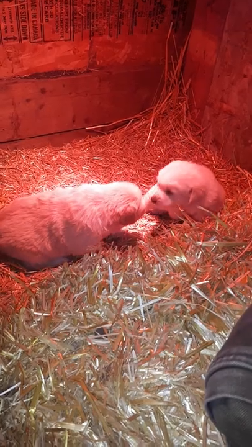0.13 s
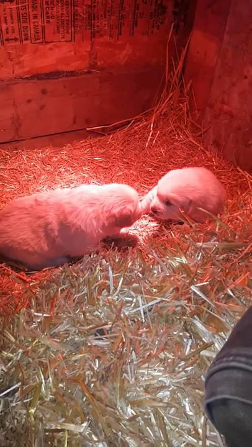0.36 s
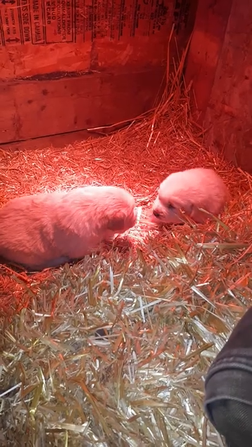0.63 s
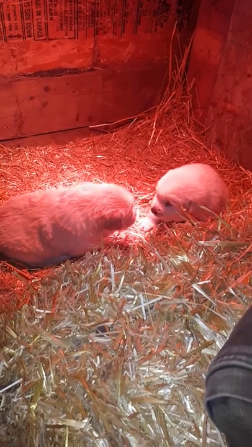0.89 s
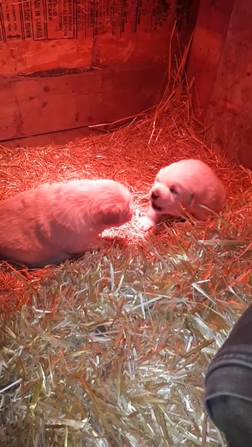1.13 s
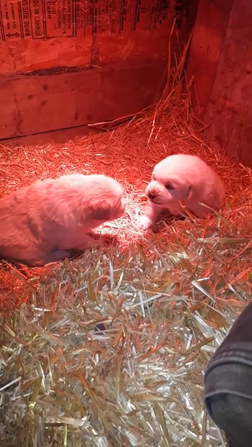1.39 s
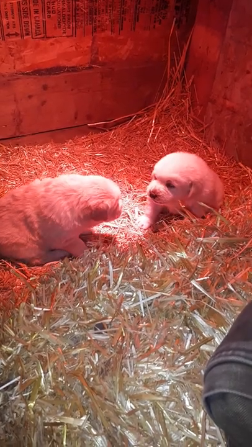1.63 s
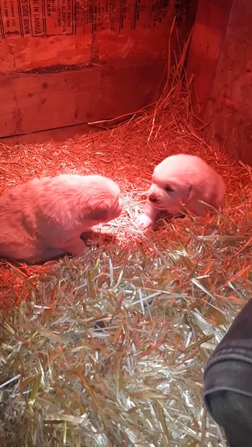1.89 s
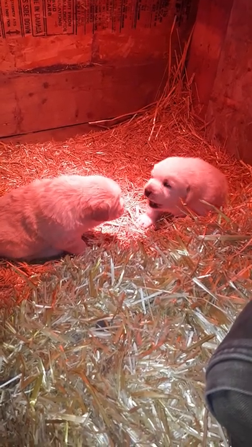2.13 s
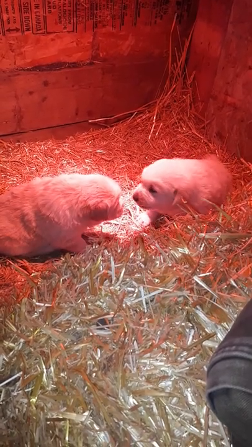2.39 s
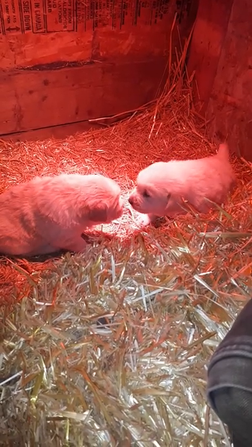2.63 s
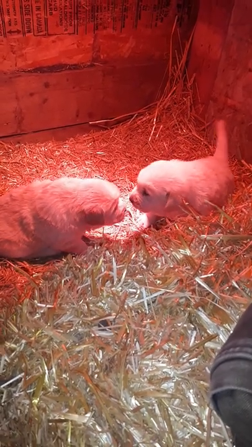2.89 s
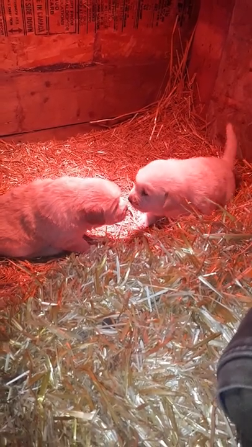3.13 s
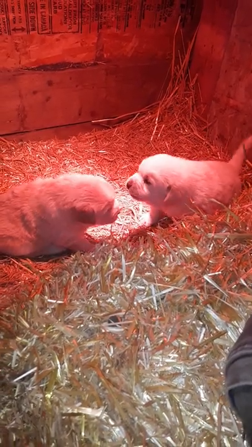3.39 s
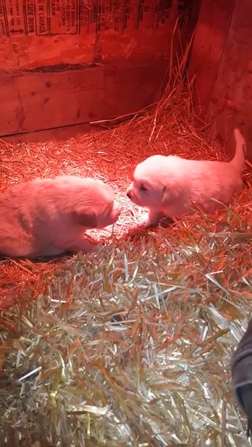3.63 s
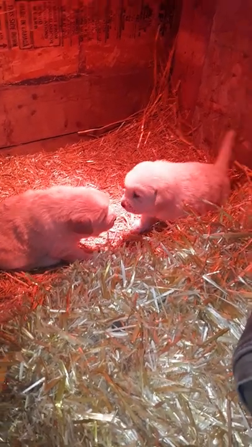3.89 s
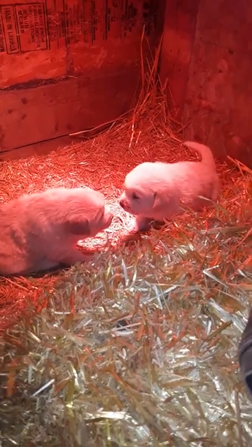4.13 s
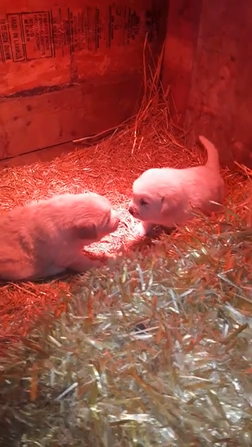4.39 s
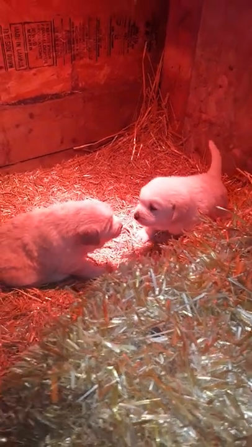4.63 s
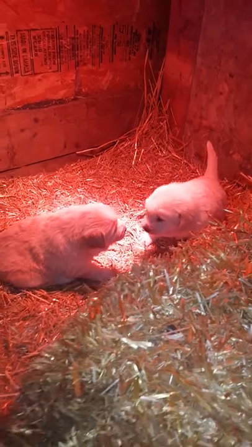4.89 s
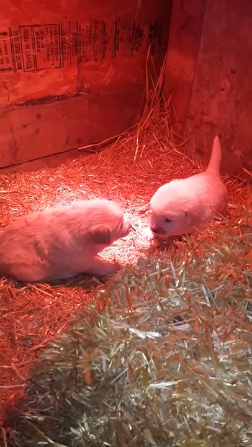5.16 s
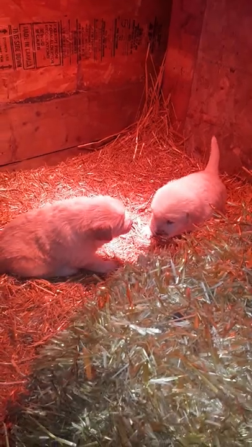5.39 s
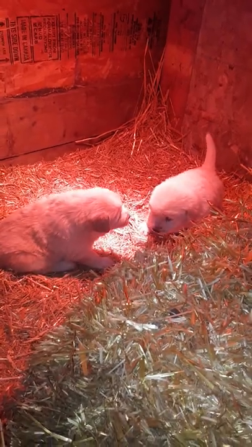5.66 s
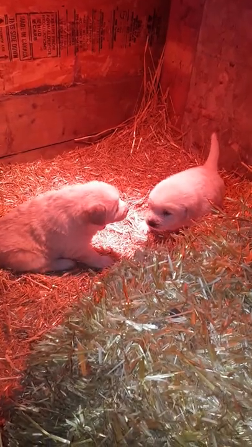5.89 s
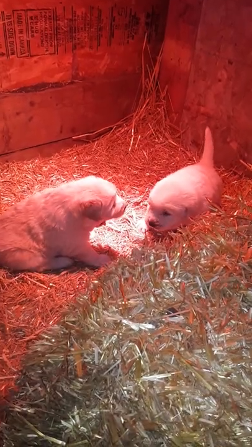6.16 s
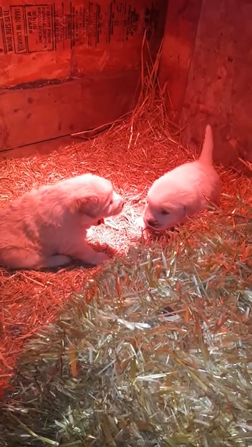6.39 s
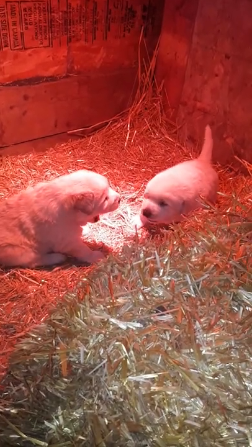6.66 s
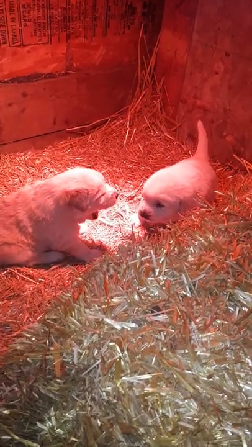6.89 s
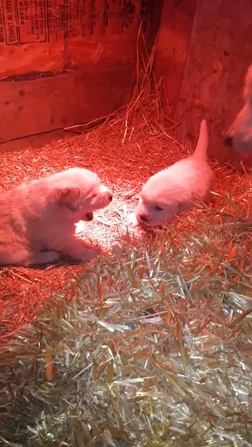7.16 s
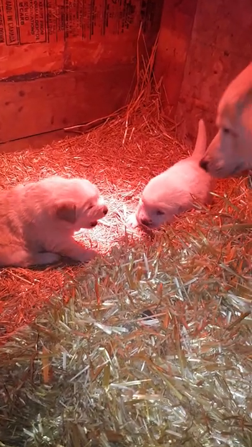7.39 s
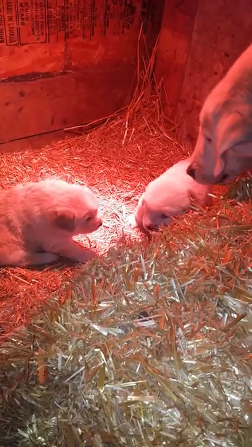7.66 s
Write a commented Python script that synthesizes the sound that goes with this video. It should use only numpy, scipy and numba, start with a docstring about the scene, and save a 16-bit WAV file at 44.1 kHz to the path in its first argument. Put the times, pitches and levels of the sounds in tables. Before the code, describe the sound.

Small puppy's rough fluttering growls rise into six short high yaps about a second apart, with dry straw crackle and a faint adult dog grunt.

```python
"""In a straw-filled wooden pen, a puppy growls in throbs and breaks into six sharp barks, left of a hand-held phone.
Vocal-fold pulses glide up and down through the throat; around the top of a bark a squeal near the mouth resonance joins.
Shaped noise makes the gasps, the straw rustle and the low barn rumble; short decaying tones make smacks and stalk snaps.
The mother's grunt is slow fold pulses with breath, and a noise tail gives the pup the short ring of the boards."""
import sys
import numpy as np
from scipy import signal
from scipy.fft import rfft, irfft
from scipy.io import wavfile
from scipy.ndimage import uniform_filter1d, minimum_filter1d
from numba import njit

SR = 44100
rng = np.random.default_rng(int(sys.argv[2]) if len(sys.argv) > 2 else 0)


def boost_factor(decibels):
    """Convert a level in decibels to a linear amplitude factor."""
    exponent = np.asarray(decibels, float) / 20
    return 10 ** exponent


def store_wav(level_fs):
    """Save 16-bit WAV to argv[1]."""
    pcm = np.round(np.clip(np.atleast_2d(level_fs), -1, 1) * 32767)
    wavfile.write(sys.argv[1], SR, pcm.T.astype(np.int16))


N = 343091
T = np.arange(N) / SR


def unit(x):
    """Scale to rms 1."""
    return x / np.sqrt(np.mean(x ** 2))


def even(x, span_s=0.038):
    """Hold the short-time rms near 1."""
    return x / np.sqrt(uniform_filter1d(x ** 2, int(span_s * SR)) + 1e-12)


def walk(rate):
    """Random levels held 1 / rate s and smoothed twice; spread near 1."""
    held = int(SR / rate)
    levels = np.repeat(rng.standard_normal(N // held + 1), held)
    return 1.4 * uniform_filter1d(uniform_filter1d(levels, held), held)[:N]


def track(tables, edge_s=0.0086):
    """Columns over time, and a soft-edged gate that is open inside the tables."""
    s, *columns = np.concatenate(tables).T
    gate = sum((T >= rows[0][0]) & (T < rows[-1][0]) for rows in tables)
    gate = uniform_filter1d(np.minimum(gate, 1.), int(edge_s * SR))
    return [np.interp(T, s, column) for column in columns] + [gate]


def swells(s, hold_s, db, rise_db_s, fall_db_s):
    """Level in dB of the loudest of several swells, each a straight rise, a hold and a straight fall."""
    rows = np.broadcast(s, hold_s, db, rise_db_s, fall_db_s)
    return np.max([peak - rise * np.maximum(start - T, 0) - fall * np.maximum(T - start - hold, 0)
                   for start, hold, peak, rise, fall in rows], axis=0)


def shape(x, table):
    """Colour by points of (frequency [Hz], gain [dB])."""
    hz, db = np.transpose(table)
    f = np.fft.rfftfreq(N, 1 / SR) + 1
    return irfft(rfft(x) * boost_factor(np.interp(np.log(f), np.log(hz), db)), N)


def cut(x, order, hz, kind):
    """Butterworth filter: keep or remove the part of the sound beside or between the edges."""
    return signal.sosfilt(signal.butter(order, hz, kind, fs=SR, output="sos"), x)


@njit
def svf(x, hz, width):
    """Band-pass with a moving centre, gain 1 there."""
    y, band, low = np.empty(len(x)), 0., 0.
    for i in range(len(x)):
        g, k = np.tan(np.pi * hz[i] / SR), width / hz[i]
        v = (band + g * (x[i] - low)) / (1 + g * (g + k))
        band, low, y[i] = 2 * v - band, low + 2 * g * v, k * v
    return y


@njit
def folds(hz, rough, chance, jitter, shimmer):
    """Vocal folds: one pulse a cycle; roughness scatters the length and size of each."""
    pulses, phase, p, k = np.zeros(len(hz) + 1), np.empty(len(hz)), 0., 0
    for i in range(len(hz)):
        step = hz[i] * (1 + jitter * rough[i] * chance[k, 0]) / SR
        p += step
        if p >= 1:
            p, k = p - 1, k + 1
            size = np.exp(shimmer * rough[i] * chance[k, 1])
            # share the pulse between two samples, so it can fall between them
            pulses[i] += size * p / step
            pulses[i + 1] += size * (1 - p / step)
        phase[i] = p
    return pulses[:-1], phase


def tract(x, modes, stretch=0.96):
    """Throat resonances side by side, with alternating sign; stretch moves every centre."""
    return sum((-1) ** k * boost_factor(db) * svf(x, np.full(N, 1. * hz) * stretch, 1. * width)
               for k, (hz, width, db) in enumerate(modes))


# colour of the barn's air: (frequency [Hz], relative level [dB per Hz])
BARN_TONE = [(15, -43), (25, -16.5), (102, -9), (157, -5.5), (229, -3.5), (439, -24.5), (695, -23.5),
             (1020, -29), (2110, -34), (3340, -48.5), (6380, -46), (9070, -60.5), (16000, -45)]
# slow rise and fall of the rumble: (time [s], level before a 3.5 dB cut [dB])
RUMBLE_LEVEL = [(0.0, -63.5), (0.71, -60), (0.84, -40), (1.13, -82.5), (1.23, -64.5), (1.78, -97),
                (2.86, -63.5), (2.99, -65.5), (5.33, -48), (7.09, -61), (7.71, -56), (7.78, -56)]


def barn():
    """Quiet air of the barn as noise, alike at both ports in the bass, and a low rumble that swells."""
    mid, side, low = rng.standard_normal((3, N))
    side = shape(side, [(60, -15), (300, -12.0), (700, 1.5), (1400, 6.5)])
    air = unit(shape(mid + side * np.array([[1], [-1]]), BARN_TONE)) * boost_factor(-53.5 + walk(3.1))
    rumble = unit(shape(low, [(25, -40.5), (50, 3.5), (100, -2.0), (150, 13), (220, -40.5)]))
    return air + rumble * boost_factor(track([RUMBLE_LEVEL])[0] - 3.5 + 2 * walk(13))


# steady bed of straw: (time [s], level before a 1 dB cut [dB], boost of the coarse stalks [dB])
STRAW_BED = [(0.0, -76.5, 14.5), (.45, -79, 20.5), (.55, -67.5, 19.5), (1.04, -66, 8), (1.32, -62.5, 15),
             (1.56, -49.5, 1), (1.73, -52.5, 12.5), (1.78, -76, 19), (2.0, -77.5, 8), (2.27, -67.5, 19.5),
             (2.71, -58, 8.5), (2.86, -58.5, 22.5), (3.68, -44, 13.5), (3.83, -52, 16.5), (4.81, -56, 18.5),
             (5.31, -72.5, 21.5), (5.5, -55, 20.5), (6.41, -58.5, 14.5), (6.76, -53.5, 17),
             (7.78, -55.5, 6.5)]
# rustles when a paw or body shifts:
# (peak time [s], level before a 1 dB cut [dB], rise [dB per s], fall [dB per s])
STRAW_RUSTLES = [(.54, -55.5, 330, 57), (.65, -68, 39.5, 357), (1.19, -36.5, 155.5, 201),
                 (1.86, -60, 241, 152), (2.12, -56, 209, 29), (2.21, -52, 52, 351.5), (2.73, -46, 703, 22),
                 (2.82, -41.5, 70.5, 220), (3.03, -49, 17.5, 62), (3.44, -32, 96.5, 220),
                 (3.75, -38.5, 96, 138), (4.29, -44, 73.5, 11.5), (4.55, -42, 243.5, 180),
                 (5.79, -45.5, 88, 199), (6.69, -47, 62, 98), (7.04, -49, 20, 81),
                 (7.17, -33.5, 603.5, 170), (7.47, -50, 17.5, 32)]
# balance of the straw: (time [s], left minus right [dB])
STRAW_BALANCE = [(0.0, 25), (0.3, -3), (0.41, 21), (2.36, 11), (2.45, 1.5), (3.72, 4.5), (4.12, 6),
                 (7.78, 17)]
# colour of rubbing stalks: (frequency [Hz], relative level [dB per Hz])
STALK_TONE = [(710, -21.5), (1200, -20.5), (2100, -12.5), (3120, -17), (3970, -11), (5570, -11.5),
              (6500, -9), (7570, -14.5), (9030, -19.5), (11400, 1), (14600, 12), (16000, 3.5), (16500, -37)]


def straw():
    """Stalks rub in a hiss of tiny clicks, unrelated at the two ports."""
    bed_db, coarse_db, _ = track([STRAW_BED])
    s, peak_db, rise, fall = np.transpose(STRAW_RUSTLES)
    db = np.maximum(bed_db, swells(s, 0, peak_db, rise, fall))
    coarse_db = coarse_db - 0.35 * (db - bed_db)  # a louder rustle has a smaller share of coarse stalks
    balance_db, _ = track([STRAW_BALANCE])
    # about 2500 clicks a second at each port
    ticks = (rng.random((2, N)) < 2500 / SR) * boost_factor(2.5 * rng.exponential(size=(2, N)))
    rub = shape(rng.standard_normal((2, N)) * (1 + .5 * ticks), STALK_TONE)
    fine = cut(rub, 4, 8500, "high")
    coarse = cut(rub, 4, 8500, "low")
    hiss = (fine + coarse * boost_factor(coarse_db)) / np.std(fine)
    return hiss * boost_factor(db - 1 + 2 * walk(45) + np.array([balance_db, -balance_db]) / 2)


# single stalks: (time [s], level of the tone at its start [dB], frequency [Hz], left minus right [dB])
STALK_SNAPS = [(0.6514, -39.5, 15200, 15), (0.8257, -39.5, 7140, 23), (0.9882, -47.5, 12300, 20.5),
               (1.173, -21.5, 13800, 9.5), (1.8097, -38, 15380, 13.5), (2.682, -50, 12060, -6.5),
               (2.7192, -44.5, 12200, 7), (4.191, -45, 14400, 21.5), (4.5491, -30.5, 15300, 20),
               (4.7202, -36, 12610, 6.5), (5.0998, -47, 13900, 20), (5.2582, -41.5, 13300, 19),
               (5.7641, -33, 15400, 19), (6.3856, -37, 15600, 4.5), (7.1413, -48.5, 13000, 16),
               (7.1637, -32.5, 13500, 21), (7.2817, -36, 14950, 22.5)]


def snaps():
    """Single stalks snap: a high tone and a crackle of noise that die away in milliseconds."""
    out = np.zeros((2, N))
    t = np.arange(SR // 100) / SR
    for s, peak_db, hz, side_db in STALK_SNAPS:
        i = int(s * SR)
        crack = np.gradient(rng.standard_normal(len(t))) * 0.34 + np.sin(2 * np.pi * hz * t)
        snap = boost_factor(peak_db + np.array([[side_db], [-side_db]]) / 2) * crack * np.exp(-t / 0.002)
        out[:, i:i + len(t)] += snap[:, :N - i]
    return out


# growl, one list a breath:
# (time [s], basic pitch [Hz], chest level [dB], mouth level [dB], rasp level [dB])
GROWL_BREATHS = [
    [(.3, 200, -58, -80, -85), (.36, 204.9, -49, -69, -86), (.45, 209.1, -43, -59.5, -82),
     (.71, 200.3, -45.5, -59, -70)],
    [(1.03, 270, -55, -67.5, -67), (1.26, 280, -33.5, -39.5, -46), (1.6, 297.7, -33.5, -41, -39.5),
     (1.7, 300, -35.5, -43, -42), (1.77, 264.8, -47, -56.5, -58)],
    [(2.03, 250, -48.5, -60, -77), (2.26, 244.5, -44, -40.5, -52), (2.4, 227.5, -43.5, -58.5, -73),
     (2.61, 209.7, -46, -61, -73)],
    [(3.16, 224.8, -56, -49, -62), (3.4, 250, -35.5, -35, -45), (3.64, 233.3, -39.5, -52.5, -64)],
    [(3.74, 204.3, -45.5, -70, -59), (4.05, 203.7, -46.5, -65, -88), (4.39, 214.8, -43, -54.5, -49),
     (4.68, 257.9, -33, -40, -47), (4.79, 224.3, -33.5, -47, -54), (5.17, 228.8, -33, -45.5, -67),
     (5.21, 206.7, -38.5, -54.5, -98), (5.43, 198.9, -41.5, -55, -57), (5.6, 220.3, -36, -62, -68),
     (5.86, 264.1, -30.5, -38.5, -45), (6.12, 222, -35.5, -51.5, -68), (6.19, 235.5, -45.5, -67.5, -75)],
    [(6.45, 214.8, -48.5, -68.5, -74), (6.6, 225.7, -45, -56, -59.5), (6.72, 228.8, -34.5, -33, -38),
     (6.78, 213.5, -33, -46, -72), (6.95, 203.6, -51, -57.5, -55)],
]


def growl():
    """The pup's growl breath by breath: pitch, the three levels, and a gate that shuts between breaths."""
    hz, *levels_db, gate = track(GROWL_BREATHS, 0.048)
    return hz, levels_db, gate ** 2


# throbs of each growl: (first throb [s], rate [per s], depth with the mouth shut [0-1])
GROWL_THROBS = [(0.381, 25.2, .3), (1.305, 25.4, .4), (2.331, 22, .4), (3.416, 20, .3), (3.761, 24.5, .2),
                (4.665, 23.9, .45), (5.201, 23.3, .2), (5.873, 23.7, .3), (6.712, 19, 0.3)]


def flap(opening):
    """A flap of tissue throbs the growl, less as the mouth opens: its depth and its phase."""
    row = np.maximum(np.searchsorted(np.array(GROWL_THROBS)[:, 0], T + .04) - 1, 0)
    start, rate, depth = np.array(GROWL_THROBS)[row].T
    phase = 2 * np.pi * (rate * (T - start) + .07 * walk(12))
    return np.clip(depth, 0, 1) * (1 - opening), phase


# chest resonances: (centre before a 4 % drop [Hz], width [Hz], gain [dB])
CHEST_MODES = [(270, 130, 7), (732, 81.6, 7.5)]


def chest(pulses, air, rough):
    """Fold pulses and breath ring in the low resonances of the chest."""
    low = tract(unit(pulses) + 0.7 * rough * unit(air), CHEST_MODES)
    return even(cut(low, 4, [150, 830], "band"))


# mouth resonances, shut and open: (centre before stretching [Hz], width [Hz], gain [dB])
MOUTH_SHUT_MODES = [(1174, 1100, -0.5), (1620, 57, 5), (1660, 130, -3), (2152, 43, 3)]
MOUTH_OPEN_MODES = [(1036, 190, 4.5), (1777, 73, 2.5), (2026, 140, 1.5), (2635, 130, -5)]


def mouth(shut_voice, open_voice, opening, stretch):
    """Middle resonances: the sound fades from the shut mouth to the open one as it opens."""
    shut = unit(tract(shut_voice, MOUTH_SHUT_MODES, 1 + 0.038 * walk(5)))
    wide = unit(tract(open_voice, MOUTH_OPEN_MODES, stretch))
    return even(cut((1 - opening) * shut + opening * wide, 6, [980, 2700], "band"))


# rasp resonances with the mouth shut: (centre before a 4 % drop [Hz], width [Hz], gain [dB])
RASP_SHUT_MODES = [(2910, 360, 11), (3350, 170, 10), (5270, 500, -18), (7400, 130, -33.5)]
# and open, passed twice: (centre before stretching [Hz], width [Hz], gain of one pass [dB])
RASP_OPEN_MODES = [(2840, 94, 2), (3460, 494, 1.5), (4530, 840, -2), (5600, 1210, -7.5)]


def rasp(shut_voice, open_voice, opening, stretch):
    """High resonances: a rasp that fades from the shut mouth to the open one."""
    shut = unit(tract(shut_voice, RASP_SHUT_MODES))
    once = tract(open_voice, RASP_OPEN_MODES, stretch)
    wide = unit(tract(once, RASP_OPEN_MODES, stretch))
    return even(cut((1 - opening) * shut + opening * wide, 4, [2600, 7600], "band"))


def voice():
    """Growl and bark: fold pulses ring in chest, mouth and rasp; effort opens the mouth and stills the throb."""
    growl_hz, growl_db, gate = growl()
    hz, levels_db, rough, squeal_hz, effort, squealing = bark(growl_hz, growl_db)
    chest_db, mouth_db, rasp_db = levels_db
    opening = np.clip(np.maximum((mouth_db + 37) / 12, 2.5 * effort - .3), 0, 1)
    depth, flap_phase = flap(opening)
    throb = (1 + depth * np.cos(flap_phase)) * boost_factor(walk(40))
    # the flap also bends the pitch, and rough folds let it waver
    hz = hz * (1 + .2 * depth * np.sin(flap_phase) + .1 * rough * walk(140))
    pulses, fold_phase = folds(hz, np.clip(rough, 0, 1), rng.standard_normal((N // 20, 2)), .12, .5)
    # breath is strongest just after each pulse
    air = rng.standard_normal(N) * np.exp(-fold_phase / 0.36)
    tone, squeal_phase = squeal(fold_phase, squeal_hz, effort, squealing)
    # the squeal chops the fold pulses, so sum and difference lines fill the mouth
    chopped = unit(pulses) * (1 + .9 * squealing * np.cos(squeal_phase))
    breathy = chopped + (1.2 - .9 * opening) * rough * unit(air)
    # with the mouth shut the nose cuts a deep notch near 2.5 kHz
    shut_voice = cut(breathy, 3, [2300, 2700], "bandstop")
    # the larynx rises with the pitch and shortens the throat
    stretch = (hz / 700) ** 0.072
    upper = boost_factor(mouth_db) * mouth(shut_voice, breathy, opening, stretch)
    upper = upper + boost_factor(rasp_db) * rasp(shut_voice, breathy, opening, stretch)
    upper = upper * boost_factor(3 * opening * walk(70))  # the open voice breaks up
    lower = boost_factor(chest_db) * chest(pulses, air, rough)
    return gate * (throb * lower + throb ** 0.53 * upper) + tone + whine()


def pen(x):
    """The boards return a dense short tail whose treble dies first."""
    t60_s, treble_t60_s, level_db = .33, .22, -11
    t = np.arange(int(.6 * SR)) / SR
    noise = rng.standard_normal((2, len(t)))
    dull = cut(noise, 2, 2000, "low")
    tail = dull * boost_factor(-60 * t / t60_s) + (noise - dull) * boost_factor(-60 * t / treble_t60_s)
    tail = tail * (t > .003)
    # so small a pen holds no bass
    tail = cut(tail, 1, 350, "high")
    return boost_factor(level_db) * signal.fftconvolve(x, tail / np.sqrt(np.sum(tail[0] ** 2)), axes=1)[:, :N]


# (peak time [s], rise [s], fall [s], level of the throat noise at the peak [dB], throat resonance [Hz])
PUP_GASPS = [(.82, 0.11, .15, -44.5, 2480), (2.75, 0.026, 0.14, -45, 1620), (3.795, 0.1, 0.25, -47, 1590),
             (6.298, 0.045, 0.024, -50.5, 1228)]


def gasps():
    """Air drawn through the throat: fluttering noise in a resonance, a nose whistle and a low puff."""
    edge_db = -18.5  # start and end of a gasp against its peak
    db, hz, gate = track([[(s - rise, db + edge_db, hz), (s, db, hz), (s + fall, db + edge_db, hz)]
                          for s, rise, fall, db, hz in PUP_GASPS])
    air = rng.standard_normal(N) * boost_factor(3.5 * walk(60))
    throat = unit(svf(air, hz, 280.))
    puff = unit(tract(air, [(300, 490, 0)])) * boost_factor(4.0)
    whistle = unit(tract(air, [(6460, 600, 0)])) * boost_factor(-27.0)
    return gate * boost_factor(db) * (throat + puff + whistle)


# (time [s], level of the tone at its start [dB], frequency [Hz])
LIP_SMACKS = [(0.795, -31, 2480), (0.869, -27, 2520), (0.904, -35.5, 870), (0.931, -36, 2188),
              (4.19, -44.5, 1270), (6.284, -31.5, 872)]


def smacks():
    """Lips smack: each is a tone with a little noise that dies away in milliseconds."""
    out = np.zeros(N)
    t = np.arange(SR // 50) / SR
    for s, peak_db, hz in LIP_SMACKS:
        pop = np.sin(2 * np.pi * hz * t) + 0.16 * rng.standard_normal(len(t))
        out[int(s * SR):int(s * SR) + len(t)] += boost_factor(peak_db) * pop * np.exp(-t / .0015)
    return out


# the six barks: (top time [s], rise [s], pitch at the top [Hz], squeal at full effort [Hz],
# mouth change on the way up [dB], mouth change on the way down [dB], rasp change [dB])
BARK_TOPS = [(1.12, 0.085, 876, 1206, 2, 4, 3.3), (2.14, 0.1, 813.4, 1156, -2, -9, -1.5),
             (3.28, .104, 894.9, 1189, 0.15, 0.37, -1.5), (4.5, 0.093, 862.1, 1106, -1.8, 1.5, -1.5),
             (5.702, .09, 851.8, 1156, -7.5, 5, 1.5), (6.575, .098, 857, 1160, -13, 1, 2.5)]
# course of every bark: (time from the top for a .09 s rise [s], chest level [dB],
# mouth level before its change [dB], rasp level before its change [dB], roughness [0-1])
BARK_COURSE = [(-.1, -75.5, -75, -90, .3), (-.085, -39.5, -48.5, -57, .3), (-.072, -34, -33, -35.5, .15),
               (-.055, -34, -25.5, -26.5, .15), (-.03, -35, -12.5, -20.5, .2), (-.012, -54, -21, -19.5, .4),
               (0.016, -52.5, -18, -18.5, .4), (0.028, -39.5, -12.5, -22.5, .3),
               (0.046, -29.5, -17.5, -31.5, .2), (.065, -34.5, -23.5, -39, .15),
               (0.099, -30.5, -29, -43.5, .15), (.14, -38, -40.5, -52, .25), (0.201, -68, -80.5, -85, .3)]


def bark(growl_hz, growl_db):
    """Each bark is an arch of effort over the growl: it lifts the pitch and plays the same course of levels."""
    sag_s, sag_power = .052, 3.4  # effort halves this long after the top
    tops = np.array(BARK_TOPS)[:, 0]
    nearest = np.searchsorted((tops[1:] + tops[:-1]) / 2, T)
    top, rise, top_hz, squeal_hz, up_db, down_db, bite_db = np.array(BARK_TOPS)[nearest].T
    since = T - top
    climb = np.cos(np.pi / 2 * np.clip(since / rise, -1, 0))
    effort = np.where(since < 0, climb, 1 / (1 + (np.abs(since) / sag_s) ** sag_power))
    hz = growl_hz + (top_hz - growl_hz) * effort
    since = np.where(since < 0, since * .09 / rise, since)
    s, *levels, roughness = np.transpose(BARK_COURSE)
    chest_db, mouth_db, rasp_db = (np.interp(since, s, level, left=-120, right=-120) for level in levels)
    rough = np.interp(since, s, roughness, left=.37, right=.37)  # outside a bark: the growl's roughness
    mouth_db = mouth_db + up_db + (down_db - up_db) * np.clip(.5 + since / .04, 0, 1)
    levels_db = np.maximum(growl_db, [chest_db, mouth_db, rasp_db + bite_db])
    squealing = uniform_filter1d(1. * (since > -0.083) * (since < .075), SR // 100)
    squeal_hz = squeal_hz * (1 - .2 * (1 - effort))  # the squeal sags as effort falls
    return hz, levels_db, rough, squeal_hz, effort, squealing


# the squeal: (start of hold [s], hold [s], basic level [dB])
SQUEAL_SWELLS = [(1.118, 0.026, -7.5), (2.105, 0.067, -7.5), (3.216, .008, -21), (3.294, 0.042, -12.5),
                 (4.487, 0.0061, -10.5), (4.523, 0.019, -16.5), (5.662, .01, -19.5), (5.759, .01, -32.5),
                 (6.543, 0.015, -16.5), (6.619, 0.012, -11)]
# the squeal flips to its octave: (start of hold [s], hold [s], basic level [dB])
OCTAVE_SWELLS = [(1.075, .02, -17.5), (1.113, 0.0085, -17), (2.06, 0.013, -28.5), (3.241, 0.016, -19.5),
                 (3.35, .01, -52), (4.471, .01, -16.5), (4.51, 0.009, -22.5), (5.692, 0.0092, -8.5),
                 (6.533, 0.041, -17.5)]


def squeal(fold_phase, hz, effort, gate):
    """A second, higher oscillation; the folds below beat against it and throw side lines."""
    first_db = swells(*np.transpose(SQUEAL_SWELLS), 599.5, 549.5)
    octave_db = swells(*np.transpose(OCTAVE_SWELLS), 599.5, 599.5)
    third_db = first_db - 9 - 19.5 * (1 - effort)  # fades as effort falls
    fourth_db = octave_db - 11.5
    phase = 2 * np.pi * np.cumsum(hz * (1 + .009 * walk(150))) / SR
    tone = sum(boost_factor(db + 2.5 * walk(90)) * np.sin((k + 1) * phase)
               for k, db in enumerate((first_db, octave_db, third_db, fourth_db)))
    tone = np.sqrt(2) * gate * tone * (1 + 0.3 * np.cos(2 * np.pi * fold_phase))
    return cut(tone, 4, 800, "high"), phase


def whine():
    """A thin wavering tone near 1160 Hz that dies away after the top of the second bark."""
    tone = np.sin(2 * np.pi * np.cumsum(1160 * (1 + 0.018 * walk(40))) / SR)
    tone = tone * boost_factor(swells(2.183, 0.14, -33, 600, 128) + 2.5 * walk(28))
    return cut(tone, 4, 800, "high")


# (time [s], pitch [Hz], level of the throat part [dB], nose part against the throat part [dB])
MOTHER_GRUNT = [(7.26, 189.2, -52.5, -8), (7.34, 193.7, -49.5, -10.5), (7.42, 340, -49, -17.5),
                (7.49, 224.9, -50.5, -21.5), (7.54, 159.5, -56.5, 0), (7.62, 150, -53.5, -2.5),
                (7.74, 143, -64, -6)]


def mother():
    """The grown dog's soft breathy grunt: rough fold pulses and noise through throat and nose resonances."""
    hz, db, nose_db, gate = track([MOTHER_GRUNT])
    pulses, _ = folds(hz, np.full(N, .45), rng.standard_normal((N // 20, 2)), .12, .5)
    breathy = unit(pulses) + 1.25 * rng.standard_normal(N)
    throat = even(tract(breathy, [(250, 150, 5), (658, 234.0, 0)]))
    nose = even(tract(breathy, [(1114, 100, 0)]))
    return gate * boost_factor(db + 2.8 * walk(14)) * (throat + boost_factor(nose_db) * nose)


# balance of the pup: (frequency [Hz], left minus right [dB])
PUP_BALANCE = [(60, -2.5), (110, 5.5), (200, -3), (380, 6), (700, 2.5), (1290, 6), (2380, 6), (4400, 9.5),
               (8120, 16.5), (15000, -10)]


def scene():
    """The pup reaches the left port first and brighter; only the pup rings in the pen."""
    pup = voice() + gasps() + smacks()
    hz, db = np.transpose(PUP_BALANCE)
    late = np.interp(T - 0.00013, T, pup)  # lag of the right port in s
    near = np.array([shape(pup, np.c_[hz, db / 2]), shape(late, np.c_[hz, -db / 2])])
    return barn() + straw() + snaps() + near + pen(near) + mother()


def low_pass(x):
    """Removes everything above the highest recorded frequency."""
    return signal.sosfilt(signal.butter(12, 16830, fs=SR, output="sos"), x)


def record(dry):
    """The phone's limiter looks ahead and eases the loudest peaks, alike in both channels."""
    gain = np.minimum(1, .95 / (np.abs(dry).max(axis=0) + 1e-9))
    gain = minimum_filter1d(gain, size=SR // 100)
    gain = uniform_filter1d(gain, size=SR // 100)
    return low_pass(dry * gain)


dry = scene()
out = record(dry)
store_wav(out)
```